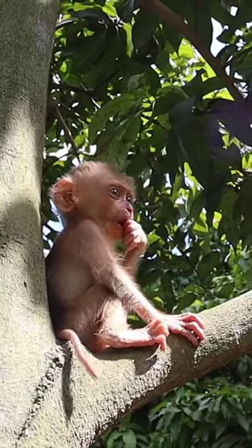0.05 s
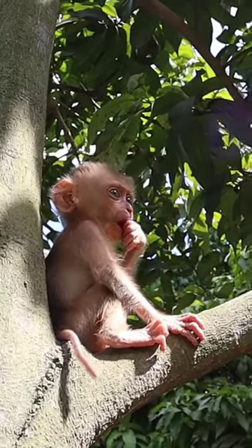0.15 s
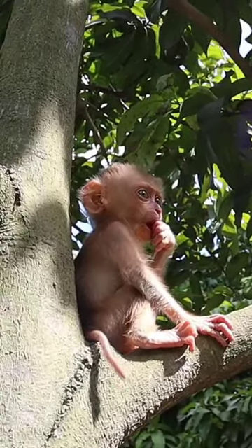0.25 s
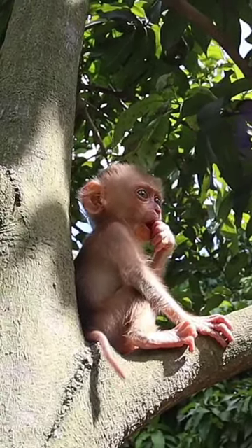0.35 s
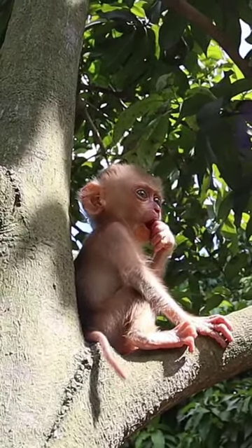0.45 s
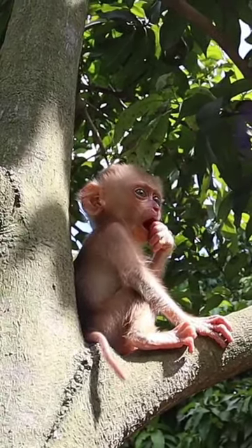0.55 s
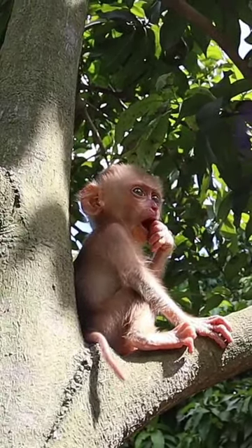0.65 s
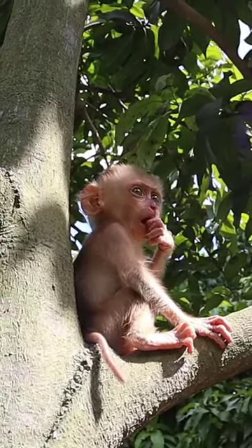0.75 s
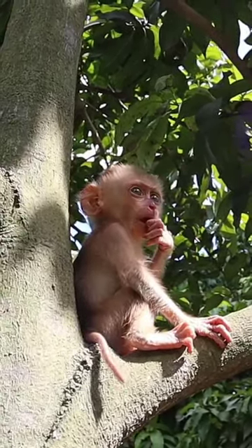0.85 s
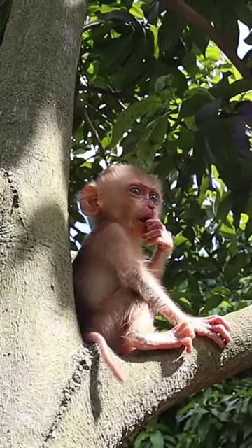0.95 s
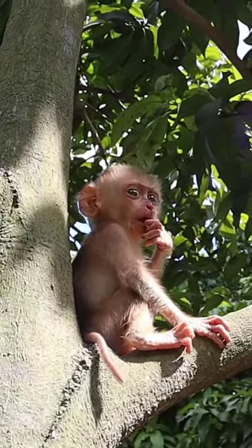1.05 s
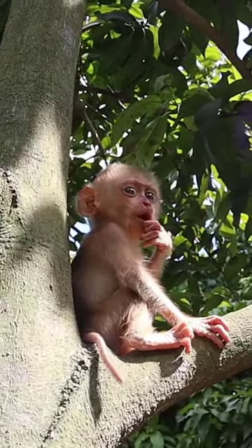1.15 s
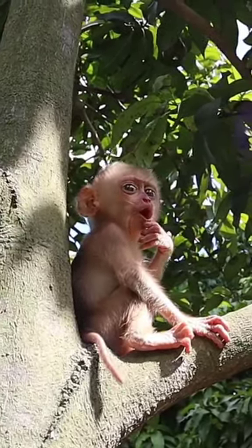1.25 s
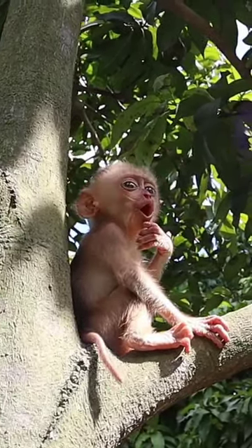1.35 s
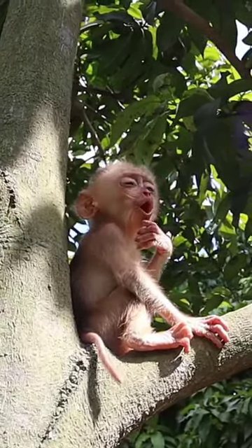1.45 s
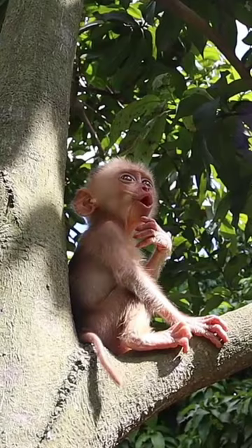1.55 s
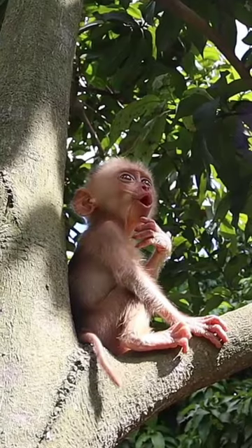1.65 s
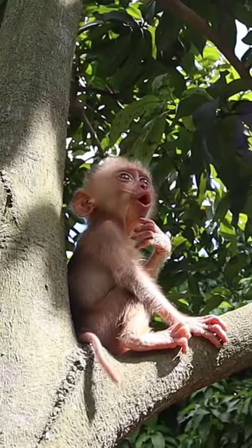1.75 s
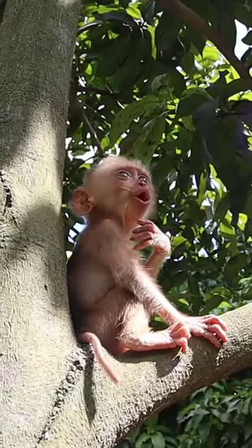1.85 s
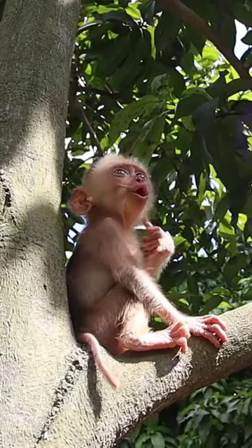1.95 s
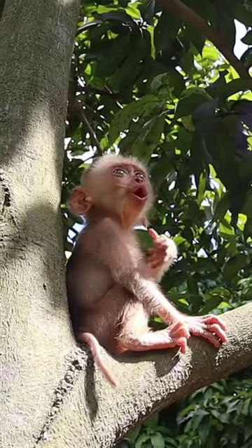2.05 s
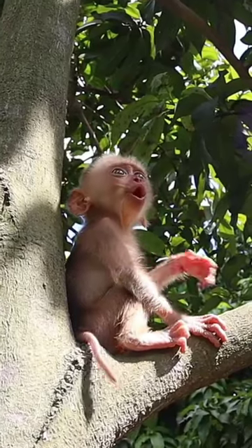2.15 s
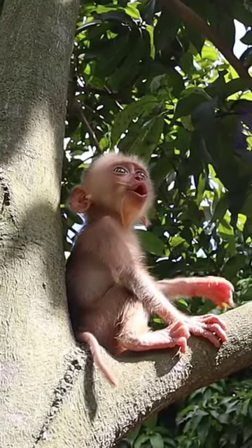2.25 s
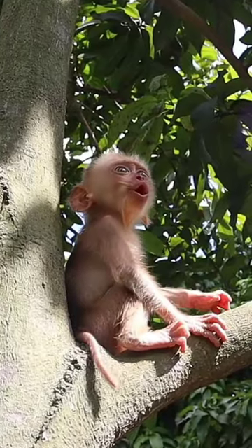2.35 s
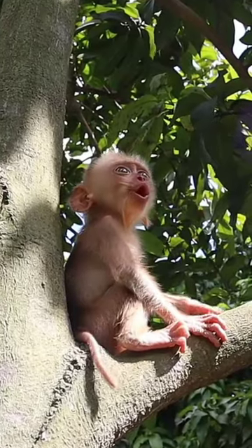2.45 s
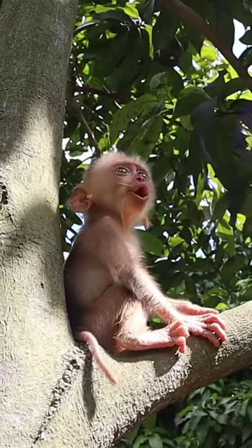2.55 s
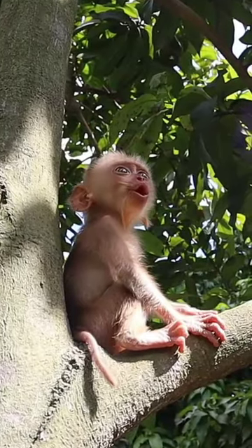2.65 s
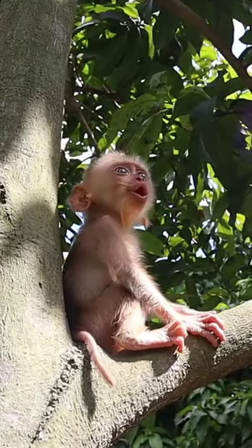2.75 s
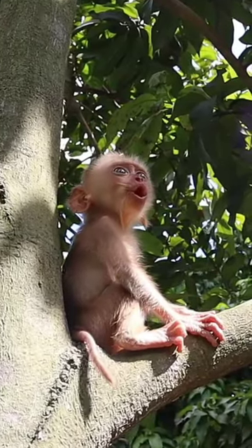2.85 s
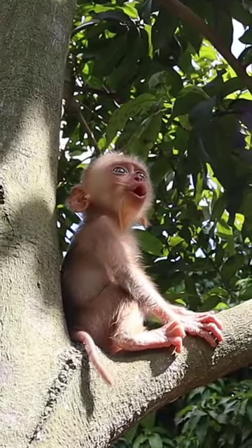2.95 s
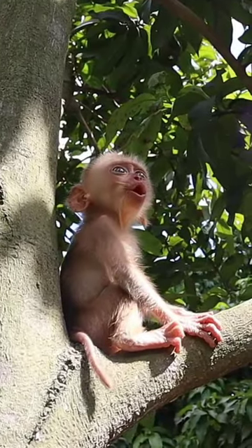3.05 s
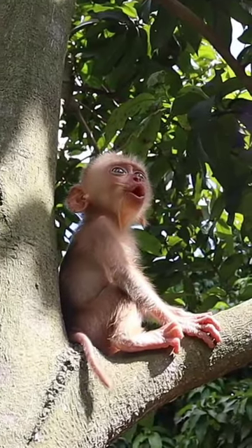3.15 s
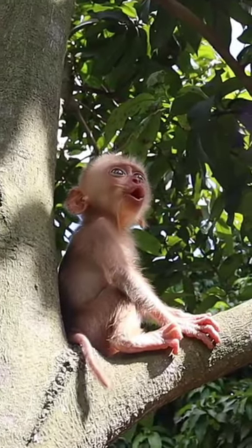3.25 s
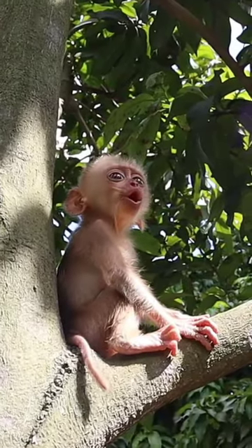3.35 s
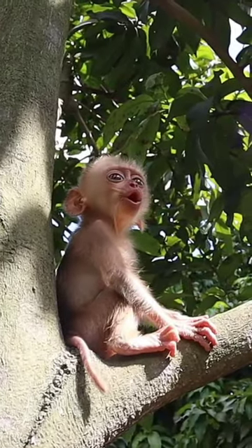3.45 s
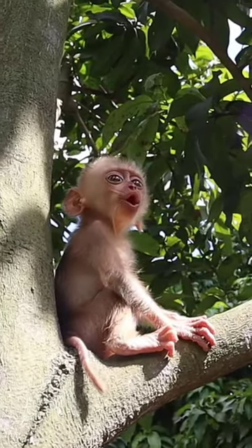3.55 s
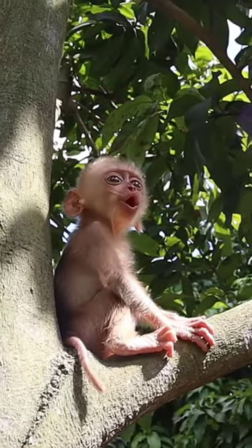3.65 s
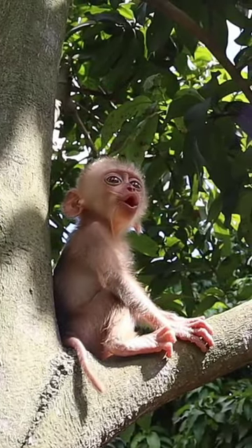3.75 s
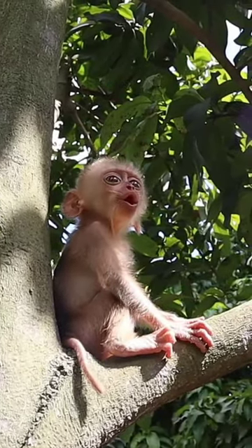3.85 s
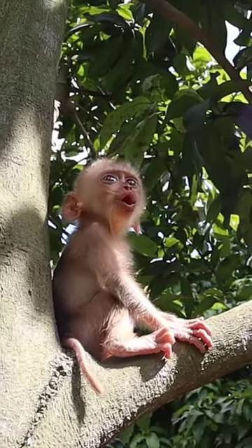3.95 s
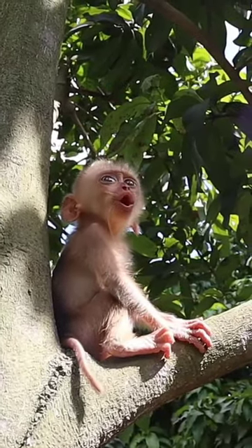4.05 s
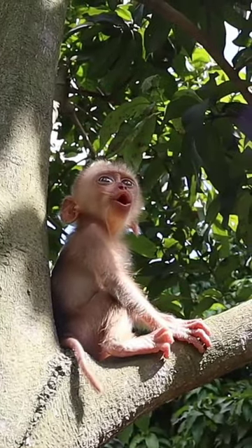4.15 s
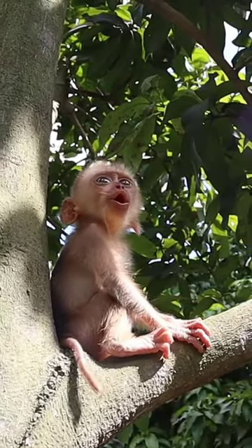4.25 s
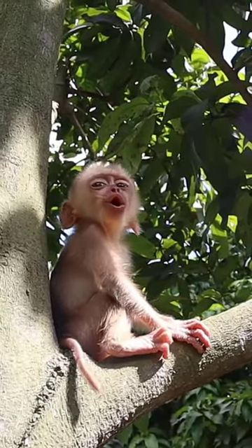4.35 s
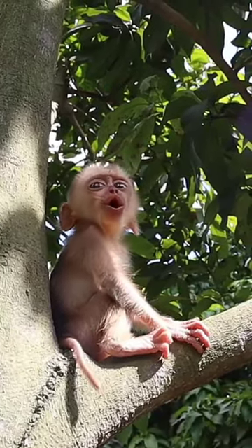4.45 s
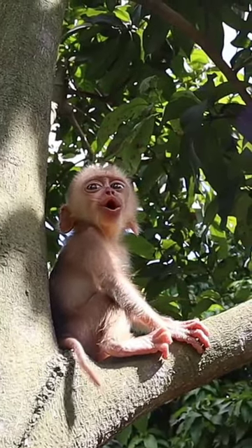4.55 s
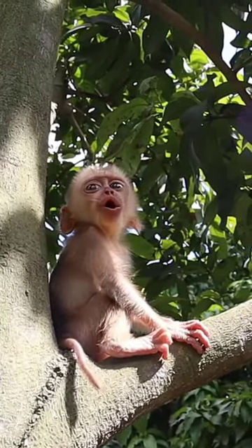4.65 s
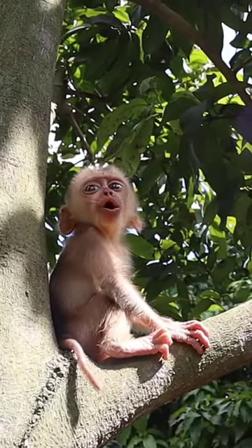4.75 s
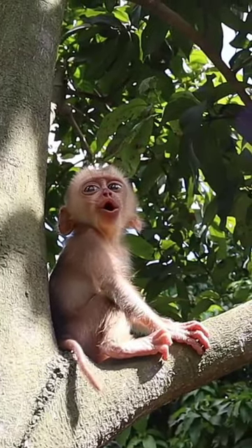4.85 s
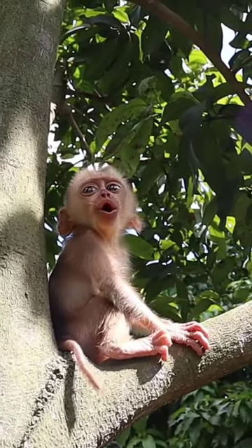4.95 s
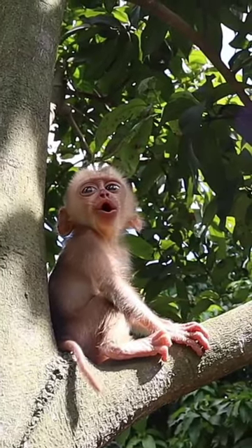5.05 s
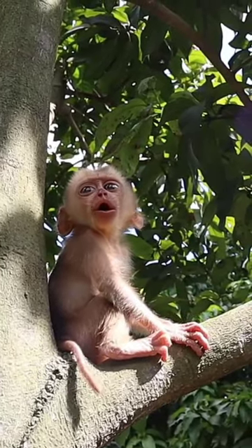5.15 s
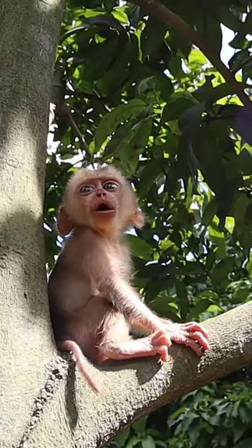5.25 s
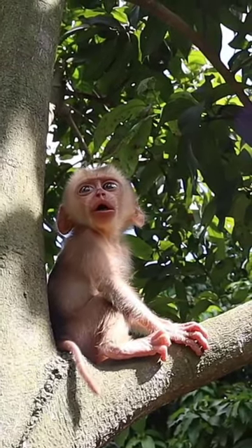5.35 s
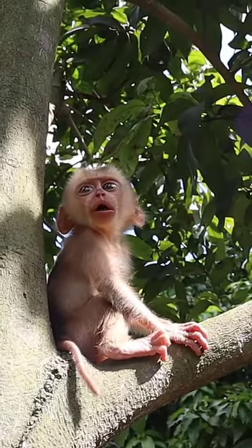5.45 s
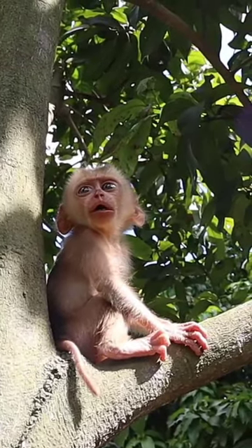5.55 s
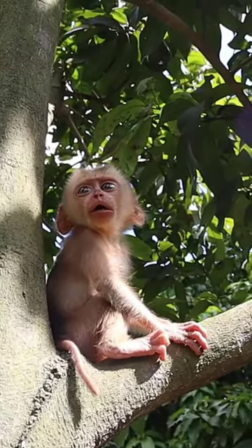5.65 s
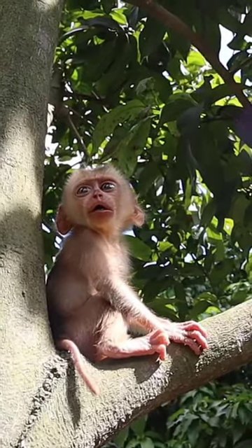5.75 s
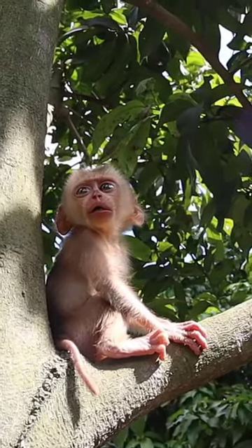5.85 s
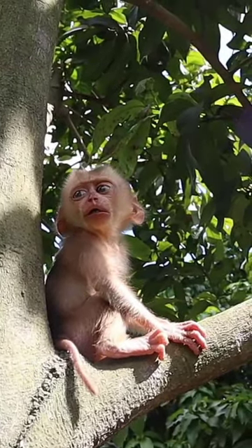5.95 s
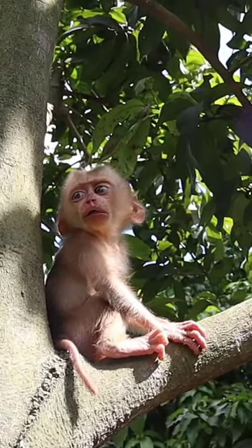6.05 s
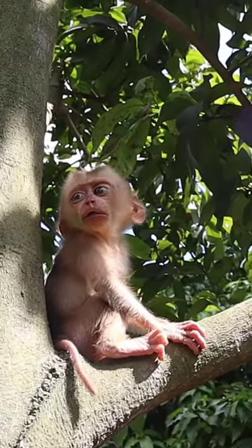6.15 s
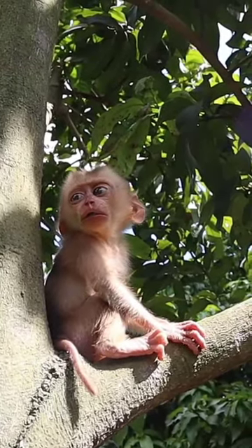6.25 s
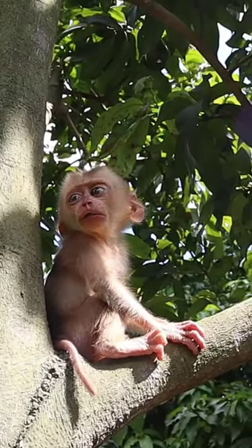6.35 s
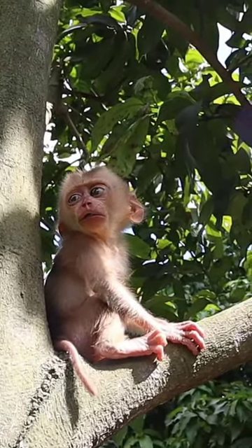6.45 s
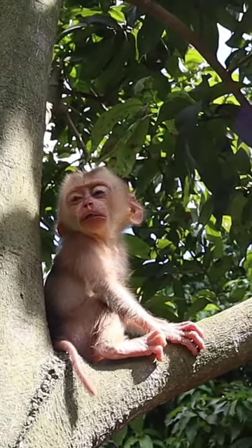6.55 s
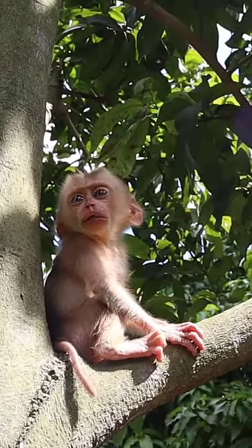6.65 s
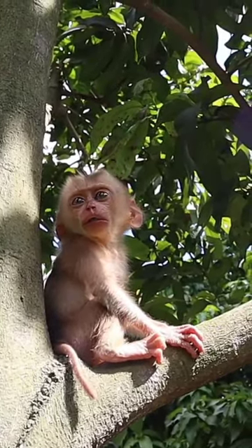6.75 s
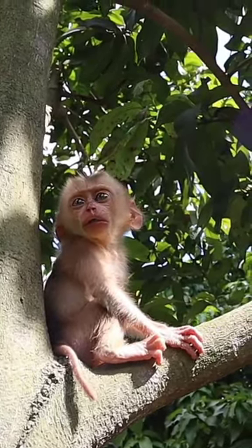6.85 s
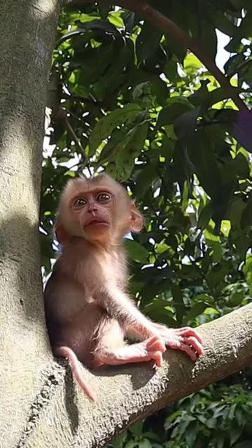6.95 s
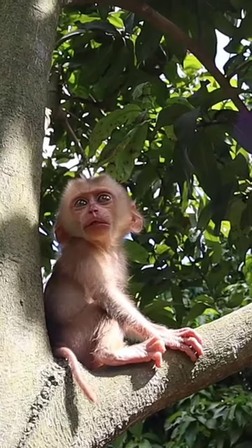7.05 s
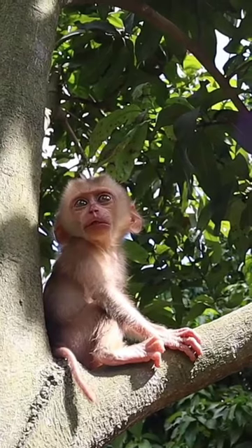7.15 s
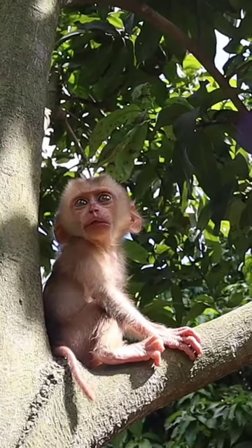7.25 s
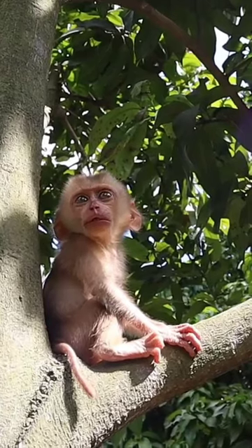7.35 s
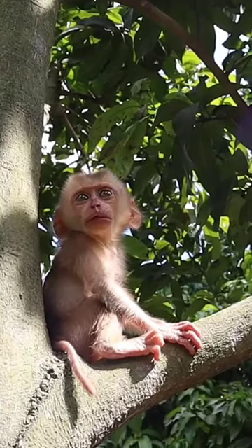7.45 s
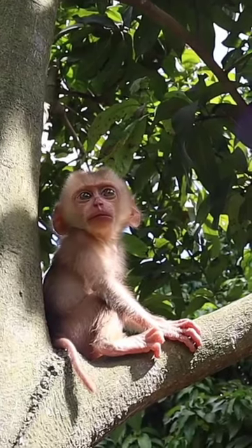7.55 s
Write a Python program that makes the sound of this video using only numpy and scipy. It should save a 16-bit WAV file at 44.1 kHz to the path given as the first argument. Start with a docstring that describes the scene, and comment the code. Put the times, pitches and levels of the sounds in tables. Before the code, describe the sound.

A young monkey in a leafy tree calls in a regular run of ten brief, shrill, hoarse yelps, the first highest, later ones slightly lower. Before and after it is very quiet: low distant rumble, a far engine drone, weak insects, faint hoots and whistles. Dull handling bumps come early and late, then dry twig ticks near the end. Open air, very short leafy echo, small stereo camera with slightly gritty highs.

```python
"""Far traffic rumble, leaf hiss, insects and a low drone, all shaped noise, last throughout; thin gliding
tones make far whistles and hoots, and two soft bumps of low noise come early. From 1.3 to 5 s a baby monkey
gives ten short, high cries: overtones glide up, sag and recover; the first eight break into a flapping rasp.
Near the end come another bump and three twig clicks, made of noise bursts and short ringing tones.
A small stereo camera hears it all and changes the sample rate by picking the nearest sample."""
import sys
import numpy as np
from scipy import signal
from scipy.fft import rfft, irfft, next_fast_len
from scipy.io import wavfile
from scipy.ndimage import map_coordinates

SR = 44100
rng = np.random.default_rng(int(sys.argv[2]) if len(sys.argv) > 2 else 0)


def store_wav(level_fs):
    """Save 16-bit WAV to argv[1]."""
    pcm = np.round(np.clip(np.atleast_2d(level_fs), -1, 1) * 32767)
    wavfile.write(sys.argv[1], SR, pcm.T.astype(np.int16))


N = 335687

# slow changes of the background: (time [s], rumble level [dB], hiss level [dB], drone level [dB])
BACKGROUND_LEVELS = [(0.0, -53, -77, -68), (0.63, -55.5, -78.5, -54.5), (1.2, -57.5, -78, -65.5),
                     (2.9, -58, -77.5, -64), (3.3, -58, -78.5, -72), (4.85, -58.5, -77.5, -74),
                     (5.26, -57.5, -79, -57), (6.3, -58.5, -77.5, -59), (7.61, -58, -75.5, -75.5)]
# colour of air rushing past the vocal folds: (frequency [Hz], relative level [dB])
BREATH_COLOUR = [(500, -29.5), (1400, -4.5), (2600, -13.5), (3800, 3.5), (5700, -11.5), (7600, -4.5),
                 (10000, -12.5), (11500, -2), (14000, -15.5), (16000, -21)]


def amp(db):
    """Turn decibels into an amplitude factor."""
    return 10 ** (np.asarray(db) / 20)


def unit(x):
    """Scale a sound to an average (RMS) size of one."""
    return x / np.sqrt(np.mean(np.abs(x) ** 2) + 1e-20)


def along(points, hz):
    """Read a value between (frequency, value) points, on a logarithmic frequency axis."""
    f, v = np.transpose(points)
    return np.interp(np.log(hz + 1), np.log(f + 1), v)


def wobble(rate, size=N):
    """A smooth random curve through `rate` random points a second."""
    knots = rng.standard_normal(int(size * rate / SR) + 4)
    return map_coordinates(knots, [np.arange(size) * rate / SR])


def filtered(x, response):
    """Reshape the spectrum of x by a response (it may be complex) to each frequency."""
    m = next_fast_len(N + SR // 2)
    return irfft(rfft(x, m) * response(np.fft.rfftfreq(m, 1 / SR)), m)[..., :N]


def air():
    """Far rumble, murmuring trees and leaf hiss: three bands of noise, each swelling at its own pace.
    Rumble arrives alike at both ports; the wide microphone pair makes the hiss mostly opposite."""
    # part shared by both ports: (frequency [Hz], relative level [dB])
    mid_colour = [(13, -48.5), (22, -19.5), (36, -8.5), (59, -3), (97, -6.5), (124, -12.5), (341, -22.5),
                  (381, -21), (474, -22), (1310, -33), (2900, -33.5), (3420, -35), (9690, -48),
                  (11700, -43.5), (15400, -81.5)]
    # part opposite at the two ports: (frequency [Hz], relative level [dB])
    side_colour = [(13, -53.5), (22, -20), (267, -2), (298, -10), (351, -5), (777, -8.5), (1240, -11),
                   (1680, -11.5), (2260, -11.5), (2820, -7.5), (3420, -12), (11400, -20.5), (15400, -50.5)]
    side_db, murmur_db = -17.5, -66
    s, rumble_db, hiss_db, _ = np.transpose(BACKGROUND_LEVELS)
    noise = rng.standard_normal((2, N))
    bands = [(rumble_db, 0, 250, 1.5, 9),  # levels [dB], low and high edge [Hz], gusts [dB], points per s
             (np.full(len(s), murmur_db), 250, 2000, .8, 5),
             (hiss_db, 2000, SR, .5, 3)]
    total = np.zeros((2, N))
    for db, lo_hz, hi_hz, gust_db, rate in bands:
        def response(f):
            colour = amp([along(mid_colour, f), along(side_colour, f) + side_db])
            return colour / (1 + (lo_hz / (f + 1)) ** 4) / (1 + (f / hi_hz) ** 4)
        layer = filtered(noise, response)
        level_db = np.interp(np.arange(N) / SR, s, db) + gust_db * wobble(rate)
        total += layer / np.std(layer[0]) * amp(level_db)
    mid, side = total
    return np.array([mid + side, mid - side])


def drone(hz, width, db, alike):
    """A faint, narrow band of noise that swells slowly; `alike` is the share common to both ports."""
    noise = rng.standard_normal((3, N))
    mixed = alike * noise[0] + (1 - alike) * noise[1:]
    band = filtered(mixed, lambda f: np.exp(-((f - hz) / width) ** 2))
    return amp(db + 2 * wobble(2.7)) * unit(band)


def insects():
    """Far insects, unrelated at the two ports, and a low engine drone, nearly alike at both."""
    # insect band: (frequency [Hz], width [Hz], middle level [dB])
    insect_band = (2720, 110, -82)
    # far engine: (frequency [Hz], width [Hz])
    engine_band = (48, 13)
    s, *_, drone_db = np.transpose(BACKGROUND_LEVELS)
    engine_db = np.interp(np.arange(N) / SR, s, drone_db)
    return drone(*insect_band, alike=0) + drone(*engine_band, engine_db, alike=0.92)


def far_calls(table, drift_hz, pulse_db):
    """Thin gliding tones of slightly unsteady pitch; some pulse 26 times a second."""
    out = np.zeros(N)
    for start, end, from_hz, to_hz, db, *depth in table:
        n = min(round(end * SR), N) - round(start * SR)
        hz = np.linspace(from_hz, to_hz, n) + drift_hz * wobble(40, size=n)
        swell = signal.windows.tukey(n, .15) * amp(db + pulse_db * wobble(25.2, size=n))
        swell *= 1 - sum(depth) * np.cos(2 * np.pi * 26 * np.arange(n) / SR)
        tone = np.sin(2 * np.pi * np.cumsum(hz) / SR)
        out[round(start * SR):][:n] += np.sqrt(2) * swell * tone
    return out


def bird():
    """Distant whistles, louder on the right, and low hoots in the middle, all single gliding tones."""
    # (start [s], end [s], start pitch [Hz], end pitch [Hz], level before panning [dB], pulsing depth [0-1])
    whistles = [(.27, .43, 2890, 2930, -76.5, 0), (.43, .48, 2934, 2840, -74, 0),
                (.86, 1.02, 2886, 2920, -77.5, 0.02), (1.03, 1.14, 2900, 2940, -83, 0),
                (1.63, 1.68, 2803, 2764, -75, 0.04), (3.83, 3.96, 2760, 2880, -78.5, 0.1),
                (5.27, 5.484, 2850, 3070, -82, 0.44), (6.7, 6.927, 2900, 2896, -80.5, 0.6),
                (7.34, 7.5, 3106, 3080, -78.5, 0), (7.5, 7.61, 2835, 2846, -79, .3)]
    # (start [s], end [s], start pitch [Hz], end pitch [Hz], middle level [dB])
    hoots = [(.03, .55, 405.6, 395, -69), (.88, 1.1, 570, 546, -77), (5.78, 6.15, 355, 348.4, -72),
             (6.4, 6.57, 307, 317, -69.5), (7.15, 7.6, 490.7, 487.5, -76)]
    whistling = far_calls(whistles, drift_hz=24.8, pulse_db=0.0) * amp([[-2], [2]])
    return whistling + far_calls(hoots, drift_hz=8.7, pulse_db=3.5)


def thuds():
    """Soft bumps on the camera: dull puffs of low noise, alike at both ports."""
    # (time a third of the way in [s], middle frequency [Hz], length [s], level before the fades [dB])
    bumps = [(0.218, 500, .15, -61.5), (.85, 120, .08, -56), (6.642, 447, .05, -54)]
    out = np.zeros(N)
    for s, hz, length, db in bumps:
        n = round(length * SR)
        band = signal.butter(3, (hz / 2, hz * 2), "band", fs=SR, output="sos")
        puff = signal.sosfilt(band, rng.standard_normal(n))
        out[round(s * SR) - n // 3:][:n] += amp(db) * unit(puff) * np.hanning(n)
    return out


def twigs():
    """Small snaps: a sharp crack, a short wooden ring and a dying, grainy crackle."""
    # (time [s], level before a 9.5 dB cut [dB], crack [dB], knock [dB], crackle [dB],
    #  crackle time to fall 60 dB [s], low edge [Hz], high edge [Hz], left minus right [dB])
    clicks = [(6.6411, -51.5, -6, 0, 2.5, 0.13, 300, 3800, -6.5),
              (7.039, -57, -12, -20, -1, 0.19, 1900, 3495, -9),
              (7.1136, -33, -2.5, -8, -11.5, .025, 1200, 11460, -10.5)]
    # ringing tones of the wood: (frequency [Hz], middle level [dB], time to fall 60 dB [s])
    wood_tones = [(590, -9, 0.038), (1100, 4, 0.033), (2338, 7, 0.0096), (3955, -4, 0.0088)]
    out, t = np.zeros((2, N + SR)), np.arange(SR // 8) / SR
    for s, db, crack_db, knock_db, crackle_db, t60, lo_hz, hi_hz, pan_db in clicks:
        ring = sum(amp(level + rng.normal(0, 1) - 60 * t / d) * np.sin(2 * np.pi * hz * t)
                   for hz, level, d in wood_tones)
        grains = amp(crackle_db - 60 * t / t60 + 5 * wobble(900, size=len(t)))
        # partly different at the two ports
        noise = rng.standard_normal(len(t)) + 0.77 * rng.standard_normal((2, len(t)))
        noise = unit(signal.lfilter(*signal.butter(2, (lo_hz, hi_hz), "band", fs=SR), noise))
        crack = (amp(crack_db - 60 * t / .006) + grains) * noise
        snap = amp(db - 9.5) * (amp(knock_db) * ring + crack)
        out[:, round(s * SR):][:, :len(t)] += snap * amp([[pan_db / 2], [-pan_db / 2]])
    return out[:, :N]


def foliage(x):
    """A short, thin echo from trunk and leaves; the moving leaves smear its lines."""
    # how fast the echo dies: (frequency [Hz], time to fall 60 dB [s])
    leaf_decay = [(800, .12), (1500, .16), (3500, .11), (9000, .05)]
    # tone of the echo: (frequency [Hz], relative level [dB])
    leaf_colour = [(800, -5.5), (1500, -4), (3500, 9.5), (9000, -0.5)]
    hz, t, z = signal.stft(rng.standard_normal((2, SR // 3)), SR, nperseg=128)
    level_db = along(leaf_colour, hz)[:, None] - 60 * t / along(leaf_decay, hz)[:, None]
    tail = signal.istft(z * amp(level_db), SR, nperseg=128)[1]
    smeared = np.pad(x * wobble(400), (300, 0))  # 300 samples late
    return signal.fftconvolve(smeared[None], tail / np.linalg.norm(tail[0]), axes=1)[:, :N]


def at_ports(x):
    """The camera body shades and delays the sound differently at the two ports, most around 4 kHz."""
    # (frequency [Hz], left minus right [dB])
    shading = [(60, -0.5), (110, -2), (200, -4), (380, -4), (700, -2), (1290, -1), (2380, -2), (4400, -8),
               (8120, -1.5), (15000, -0.5)]
    # (frequency [Hz], phase by which left leads [radians])
    phase_lead = [(700, .3), (1000, .33), (1400, .33), (2150, 0.37), (3000, 1.5), (3800, 1.5), (4400, 2),
                  (5000, 1.42), (8000, 0.5)]

    def response(f):
        left = amp(along(shading, f)) * np.exp(1j * along(phase_lead, f))
        return np.array([2 * left, 2 + 0 * left]) / (1 + left)
    return filtered(x, response)


def rasp_level(t):
    """Level of the rasp in dB: full within a break of the voice, with ramps before and after."""
    # (start [s], end [s], level before the throat [dB])
    breaks = [(1.431, 1.452, -41), (1.453, 1.466, -36.5), (1.468, 1.5, -51), (1.761, 1.778, -46.5),
              (1.777, 1.8, -30), (1.804, 1.832, -46.5), (2.138, 2.15, -50), (2.153, 2.178, -29.5),
              (2.181, 2.191, -34.5), (2.19, 2.22, -52.5), (2.512, 2.528, -53), (2.531, 2.546, -34),
              (2.544, 2.572, -28), (2.58, 2.597, -55), (2.925, 2.946, -31), (2.952, 2.983, -45.5),
              (3.319, 3.333, -31.5), (3.338, 3.35, -34), (3.356, 3.37, -53.5), (3.718, 3.737, -31),
              (3.74, 3.77, -55.5), (4.123, 4.139, -33.5), (4.148, 4.17, -54), (4.994, 5.005, -60)]
    rise, fall = 2600, 5000  # dB per s
    start, end, db = np.transpose(breaks)[:, :, None]
    ramps_db = rise * np.maximum(start - t, 0) + fall * np.maximum(t - end, 0)
    return np.max(db - ramps_db, axis=0)


def cry(rows):
    """Clean partials on the pitch, coloured by the throat, with breath noise in one puff a cycle.
    In the rasp a slower, unsteady flapping of the folds puts side lines around each partial."""
    # throat and mouth, as they colour voice and rasp: (frequency [Hz], level [dB])
    throat = [(300, -27), (700, -16.5), (900, -15.5), (1000, -13), (1200, -10), (1330, -1.5), (1450, 4.5),
              (1750, -7), (2100, -14), (2600, -30), (2800, -26), (3000, -18.5), (3400, -13), (3750, -8),
              (4050, -14), (4500, -22.5), (4900, -41), (5250, -29), (5800, -30)]
    # slower flapping in the rasp: (pitch [Hz], flapping rate [Hz])
    flapping = [(1000, 330), (1330, 210)]
    # partials 2, 3 and 4 against the fundamental, at sharpness 0: (level [dB])
    overtones = (-11.5, -8.5, -12.5)
    attack_s, release_s, fade_depth_db = .009, .012, 36  # each cry rises from and falls by this depth
    linger_s, breath_rise, breath_fall = .03, 1500, 898  # s, dB per s: the breath outlasts the voice
    breath_base_db, breath_grows, breath_sharpens = -55, 1.3, .6  # at effort -20 dB; per dB of each
    breath_tires = 1.03  # dB per s: later cries carry less air
    torn_db, torn_turns = -14.5, 0.3  # rasp over effort for full shake; radians per partial number
    jitter, shimmer_db, overtones_fade = 0.0035, 0.93, 1.5  # overtones fade faster than the fundamental
    waver_hz, waver_db, waver_turns, slip = 110, 3.0, .5, 0.88  # unsteady side lines; last two in radians

    s, *cols = np.transpose(rows)
    first = round((s[0] - attack_s) * SR)
    t = np.arange(first, round((s[-1] + linger_s) * SR)) / SR
    size = len(t)
    hz, effort_db, sharp_db = [np.interp(t, s, c) for c in cols]
    before, after = np.maximum(s[0] - t, 0), np.maximum(t - s[-1], 0)
    fade_db = -fade_depth_db * (before / attack_s + after / release_s)
    breath_db = breath_base_db + breath_grows * (effort_db + 20) + breath_sharpens * sharp_db
    breath_db -= breath_rise * before + breath_fall * after + breath_tires * t
    # between breaks a trace of rasp stays 45 dB under the effort
    rasp_db = np.maximum(rasp_level(t), effort_db - 45) + .4 * fade_db

    phase = 2 * np.pi * np.cumsum(hz * (1 + jitter * wobble(150, size=size))) / SR
    torn = np.minimum(amp(rasp_db - effort_db - torn_db), 1)
    phase += torn_turns * torn * wobble(300, size=size)
    folds_db = [0 * t]
    for db in overtones:
        folds_db.append(db + sharp_db + (overtones_fade - 1) * fade_db + shimmer_db * wobble(70, size=size))
    clean = np.zeros(size)
    for k, db in enumerate(folds_db, start=1):
        level = amp(effort_db + fade_db + db + along(throat, k * hz))
        offset = (k - 1) * np.pi / 2 * ((k - 1) % 2)
        clean += np.sqrt(2) * level * np.cos(k * phase + offset)
    # weak upper partials rise and fall with the breath
    upper = sum(np.cos(k * phase) * amp(along(BREATH_COLOUR, k * hz)) for k in range(5, 11))
    clean += amp(breath_db + fade_db - 2) * upper

    flap_hz = along(flapping, hz)
    flap = 2 * np.pi * np.cumsum(flap_hz) / SR + slip * wobble(90, size=size)
    rasp = np.zeros(size)
    for k in range(1, 5):  # partials
        for j in (-2, -1, 1, 2):  # side lines below and above each
            waver = amp(waver_db * wobble(waver_hz, size=size))
            waver = waver * np.exp(1j * waver_turns * wobble(waver_hz, size=size))
            # farther side lines are weaker, higher partials are lifted
            line_db = along(throat, k * hz + j * flap_hz) - 4 * (abs(j) - 0.5) + 1.5 * (k - 1.5)
            turning = np.exp(1j * (k * phase + j * flap + rng.uniform(0, 2 * np.pi)))
            rasp += (amp(line_db) * waver * turning).real
    ends = signal.windows.tukey(size, .04)
    puffs = amp(breath_db) * (1 + 0.47 * np.cos(phase))
    return first, ends * (clean + amp(rasp_db) * rasp), ends * puffs


def monkey():
    """All ten cries: the voiced sound, and apart from it the breath noise that the airflow shapes."""
    # one list per cry: (time [s], pitch [Hz], effort before the throat [dB],
    #  sharpness: lift of the overtones [dB])
    cries = [
        [(1.319, 1309, -29.5, -2), (1.34, 1354, -24.5, 1.5), (1.346, 1398, -22.5, -2.5),
         (1.365, 1411, -21.5, -2.5), (1.385, 1444, -21, -2.5), (1.415, 1445, -19.0, -1.0),
         (1.428, 1379, -18, -3.5), (1.435, 1170, -19.5, 3), (1.447, 1190, -21, 4), (1.452, 1341, -21.5, 0),
         (1.456, 1370, -16.5, 2.5), (1.46, 1310, -21, 1), (1.465, 1120, -26.5, 6.5), (1.478, 1105, -22, 5),
         (1.485, 1280, -23, -2.5), (1.492, 1323, -21.5, 1), (1.501, 1323, -24, 2.5)],
        [(1.702, 1058, -23.5, -6), (1.727, 1205, -19.5, 1.0), (1.752, 1287, -18, 2), (1.779, 1320, -16.5, 0.5),
         (1.784, 1388, -20, -0.5), (1.794, 1360, -18, 3.5), (1.798, 1030, -21.5, 4.5), (1.809, 983, -19.5, 6),
         (1.818, 997, -19.5, 3.5), (1.828, 1182, -20.5, -0.5), (1.831, 1209, -19.5, 1), (1.836, 1220, -22.5, 3)],
        [(2.072, 1049, -24.5, -9), (2.084, 1083, -23.5, -5.5), (2.105, 1163, -21, 0), (2.127, 1216, -17.5, 3.5),
         (2.153, 1290, -17.5, 2), (2.158, 1341, -16.5, 0.5), (2.175, 1320, -18, 0.0), (2.18, 1030, -19.0, 4),
         (2.194, 973, -20, 6), (2.203, 974, -18.5, 0.5), (2.212, 1166, -22, 0.5), (2.215, 1191, -19.5, -0.5),
         (2.219, 1187, -22.5, 5.5)],
        [(2.432, 1025, -23.0, -5.5), (2.475, 1146, -20, 2.5), (2.486, 1185, -16.5, 2.5),
         (2.506, 1230, -16.5, 2.5), (2.529, 1216, -16.5, 6.5), (2.536, 1035, -16, 1.0),
         (2.554, 1010, -17, -1.0), (2.567, 956, -18.0, 2.5), (2.579, 951, -18.0, 2.0), (2.585, 1021, -18.5, 0),
         (2.591, 1116, -18.5, -4.5), (2.601, 1030, -27, -1.5)],
        [(2.823, 996, -25, -5), (2.836, 1020, -21, -4.5), (2.875, 1164, -19.5, 2.5), (2.899, 1204, -15, 2.5),
         (2.913, 1163, -17.5, 5), (2.929, 1061, -17, -1.5), (2.955, 917, -19.5, 2.5), (2.965, 988, -18, 2),
         (2.977, 1121, -19.0, -2), (2.989, 1116, -27.5, 2)],
        [(3.212, 952, -24, -6.5), (3.226, 993, -23, -1.5), (3.26, 1094, -18, -3.5), (3.28, 1143, -20, 6.5),
         (3.294, 1173, -20, 6), (3.305, 1103, -17.5, 4), (3.317, 1025, -17.0, 0), (3.347, 928, -19, 3),
         (3.36, 975, -17.5, 0.5), (3.371, 1059, -19.5, -5), (3.377, 1060, -22.5, -1.5)],
        [(3.609, 965, -24.5, -5.0), (3.623, 1011, -22.5, -2.0), (3.662, 1146, -20, 0.5), (3.681, 1151, -19, 6),
         (3.704, 1152, -19, 5.5), (3.716, 1019, -16.5, 0.5), (3.733, 966, -20.5, 2.5), (3.746, 904, -18, 3.5),
         (3.768, 1097, -20.0, -0.5), (3.779, 1071, -23.5, 0)],
        [(4.004, 946, -23, -6), (4.015, 931, -24.5, -5.5), (4.029, 996, -21.0, 1), (4.066, 1066, -18, -2),
         (4.093, 1140, -18.5, 3.5), (4.105, 1087, -19, 4), (4.129, 975, -17.5, 0.5), (4.145, 970, -19, 1.5),
         (4.155, 1006, -20.5, 3.5), (4.168, 1105, -20, -1.5), (4.176, 1060, -28, 3)],
        [(4.411, 950, -25, -8), (4.423, 958, -24.5, -2), (4.459, 1105, -20.5, -2), (4.487, 1160, -22.5, 1.5),
         (4.507, 1185, -18, 1.5), (4.527, 1124, -21, 1.5), (4.546, 1059, -20.5, -4), (4.558, 1101, -23, 4),
         (4.576, 1171, -24.5, -5), (4.582, 1168, -29.0, 7.5)],
        [(4.837, 985, -28.0, -7.5), (4.861, 1021, -24, -3), (4.883, 1134, -24, -2.5), (4.902, 1170, -19.5, 0),
         (4.934, 1241, -19, -2), (4.952, 1188, -19, 4), (4.966, 1139, -20, 0.5), (4.977, 1005, -21.5, 0),
         (4.987, 1003, -18.5, 4), (4.998, 1175, -23, 0.0), (5.005, 1211, -23, -1), (5.012, 1180, -24, 2)],
    ]
    voice, flow = np.zeros(N), np.zeros(N)
    for rows in cries:
        start, sound, breath = cry(rows)
        voice[start:start + len(sound)] += sound
        flow[start:start + len(sound)] += breath
    noise = rng.standard_normal((3, N))
    noise = noise[0] + .7 * noise[1:]  # partly different at the two ports
    hiss = unit(filtered(noise, lambda f: amp(along(BREATH_COLOUR, f))))
    return voice, flow * hiss * amp([[-.5], [.5]])


def scene():
    """Everything that reaches the two ports of the camera."""
    voice, breath = monkey()
    echo = amp(-18.5) * foliage(voice + 2 * breath.mean(axis=0))
    background = air() + insects() + bird()
    return background + thuds() + twigs() + echo + at_ports(voice) + breath


def record(dry):
    """Picking the nearest sample at another rate adds mirrored partials beside the true ones.
    It restarts with each block, so the mirrored lines jump in phase; low cut and band limit follow."""
    camera_rate, top_hz, low_cut_hz = 48000, 15500, 40
    block_in, block_out, block_start = 1024, 941, -80  # samples
    padded = np.pad(dry, ((0, 0), (-block_start, block_out)))
    camera = signal.resample_poly(padded, block_in, block_out, axis=1)
    block, within = np.divmod(np.arange(N) - block_start, block_out)
    nearest = np.round(within * camera_rate / SR).astype(int)
    picked = camera[:, block * block_in + nearest]
    return filtered(picked, lambda hz: (hz < top_hz) / (1 + (low_cut_hz / (hz + 1)) ** 6))


dry = scene()
out = record(dry)
store_wav(out)
```